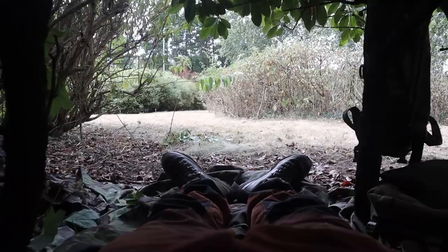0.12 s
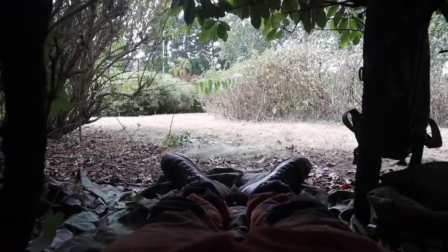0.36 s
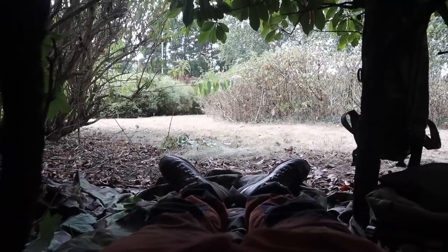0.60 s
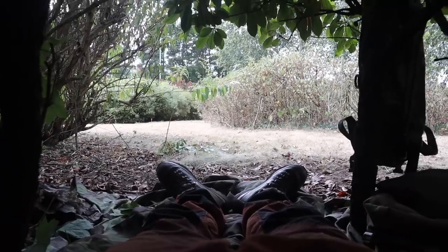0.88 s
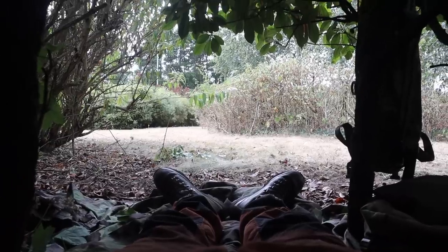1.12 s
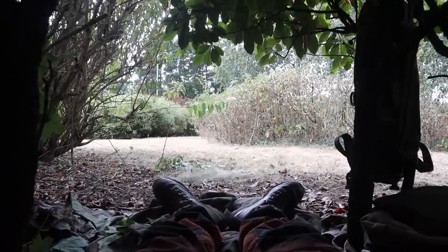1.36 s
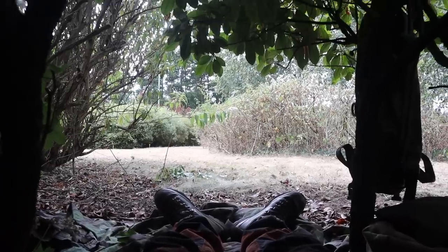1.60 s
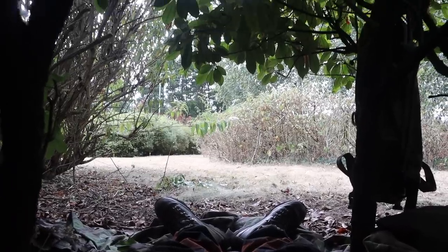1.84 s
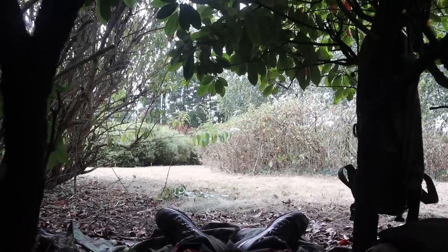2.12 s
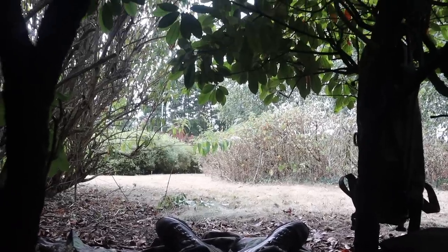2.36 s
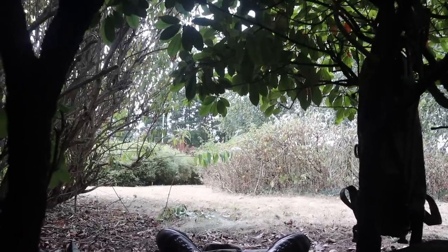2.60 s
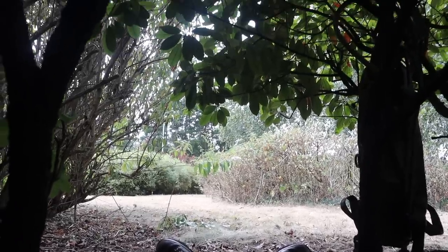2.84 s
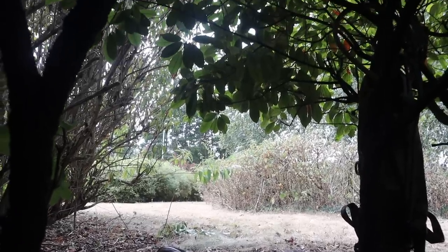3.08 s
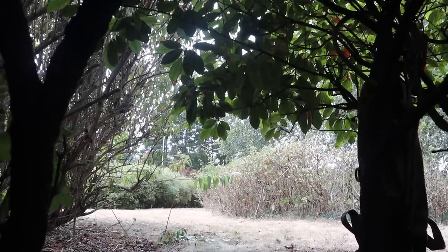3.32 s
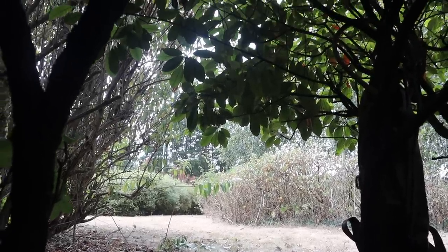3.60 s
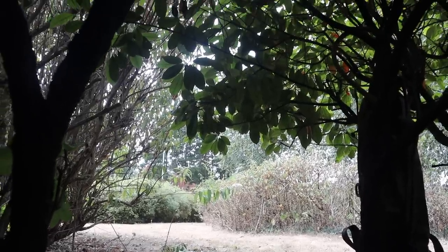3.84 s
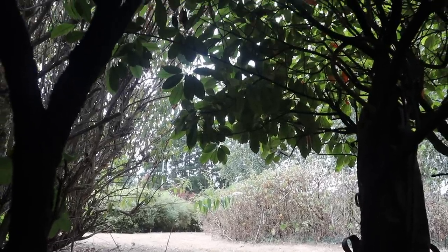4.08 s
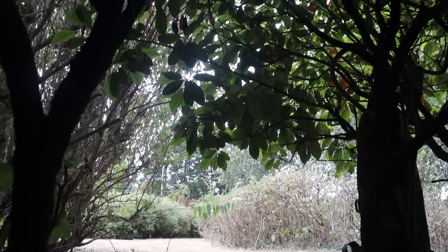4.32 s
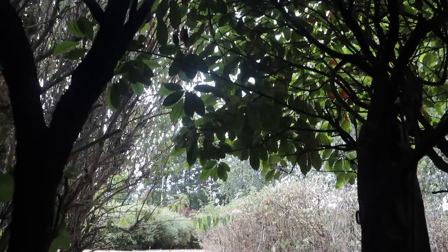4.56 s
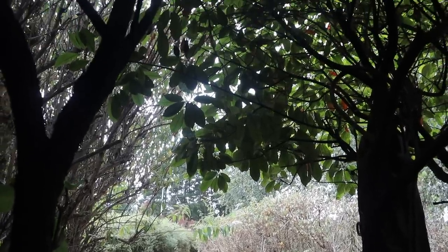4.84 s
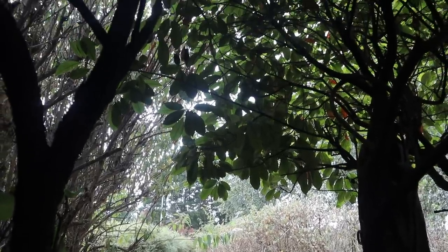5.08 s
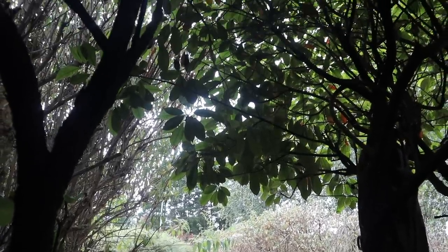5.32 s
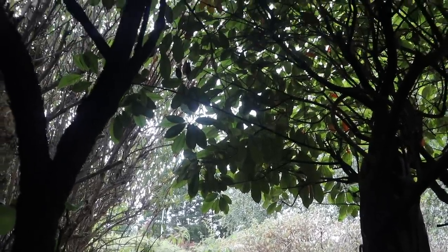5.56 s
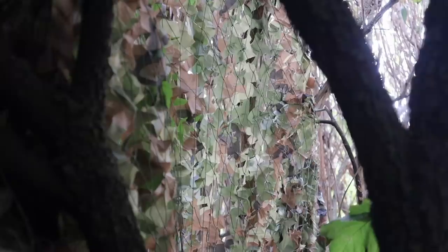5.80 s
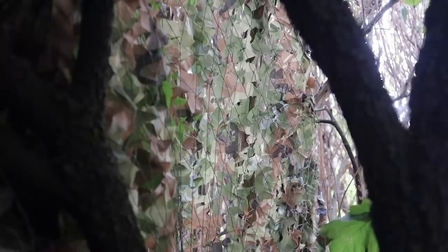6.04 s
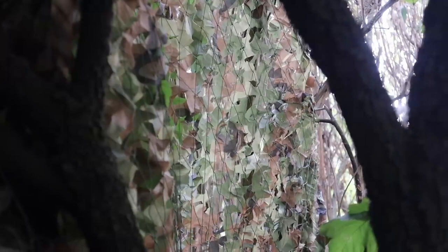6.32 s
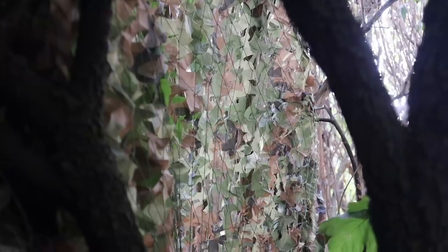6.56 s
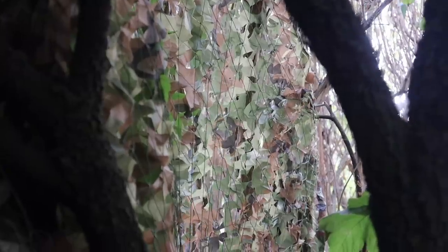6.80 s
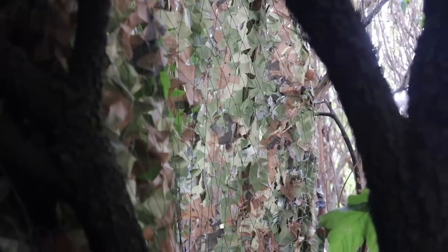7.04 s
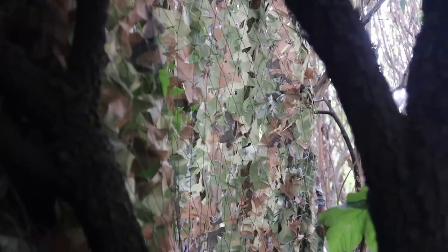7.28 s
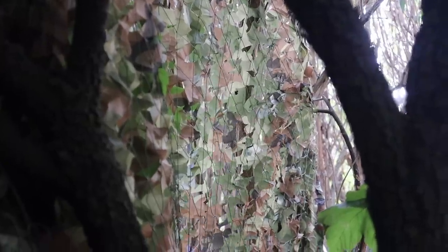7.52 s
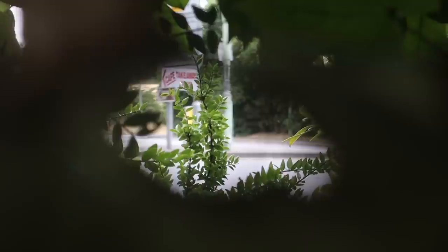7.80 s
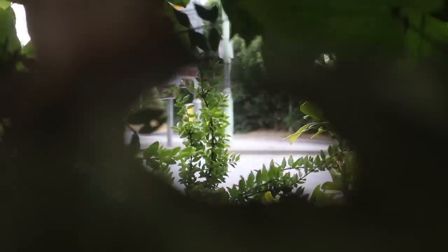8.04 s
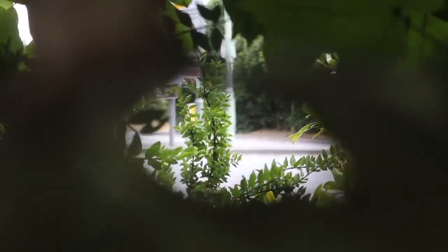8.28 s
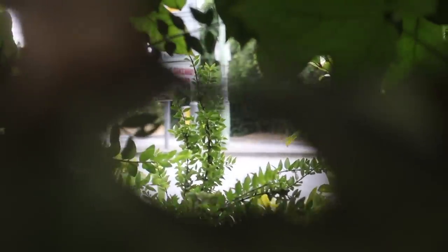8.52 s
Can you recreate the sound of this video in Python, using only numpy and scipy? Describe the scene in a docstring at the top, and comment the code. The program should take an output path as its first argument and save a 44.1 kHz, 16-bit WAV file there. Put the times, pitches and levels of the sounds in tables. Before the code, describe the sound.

From a hidden spot in shrubs, distant road rumble grows into a loud diesel and tyre roar, then cuts to brake squeaks and idling engines.

```python
"""A roundabout heard from inside the bushes, in four shots: traffic circles and a heavy diesel draws near.
Traffic is shaped noise that swells with closeness; engines are sums of sines at multiples of a firing tone.
Birds and brake squeals are gliding sines; air puffs and a snapping twig are short noise bursts.
The widening microphone leaves the treble largely out of phase between the channels.
The first two shots abut; a silent gap precedes each of the last two, which fade in fast."""
import sys
import numpy as np
from scipy import signal
from scipy.io import wavfile
from scipy.ndimage import uniform_filter1d, map_coordinates

SR = 44100
rng = np.random.default_rng(int(sys.argv[2]) if len(sys.argv) > 2 else 0)


def master(y):
    """Save y as 16-bit WAV."""
    cut = np.clip(np.atleast_2d(y).T, -1, 1)
    pcm = np.round(cut * 32767)  # scale
    wavfile.write(sys.argv[1], SR, pcm.astype(np.int16))


def convert_level_to_amplitude(level_db):
    """Map a level in decibels to its linear amplitude factor."""
    exponent = np.asarray(level_db, float) / 20
    return 10 ** exponent


N = 381465

# Limits of the four shots: start_s, end_s
SHOT_LIMITS = [(0, .115), (.115, 5.6553), (5.7, 7.7487), (7.795, 8.7)]
# Noise spectra, relative power density: frequency_hz, density_db (per Hz)
# Exhaust rumble
RUMBLE_SPECTRUM = [(18, -36), (30, 3.5), (65, -0.5), (150, -8), (200, -23.5), (330, -120)]
# Body roar
ROAR_SPECTRUM = [(65, -66), (110, -5), (135, -4), (220, 0.5), (263, -2), (340, -7), (440, -33.5),
                 (750, -120)]
# Drone above the roar
DRONE_SPECTRUM = [(180, -19), (300, -5.5), (398, -3.5), (493, -4), (700, -10.5), (910, -18.5), (1540, -120)]
# Tyre noise
TYRE_SPECTRUM = [(360, -43), (620, -8), (1030, -6.5), (1230, -13.5), (1350, -14.5), (1760, -22.5),
                 (2970, -120)]
# Whine of the tread
TREAD_SPECTRUM = [(680, -48), (1150, 3.5), (1480, 2.5), (1680, 4.5), (2030, 4), (2200, 0.5), (2700, -4),
                  (3510, -16), (5940, -120)]
# Tread hiss
HISS_SPECTRUM = [(1410, -72), (2400, -5), (2700, -3.5), (3020, 0), (4330, -6), (6380, -17.5), (7500, -30),
                 (9750, -53), (16500, -120)]
# Finest spray
FIZZ_SPECTRUM = [(3240, -41.5), (5500, -20), (6480, -3), (7290, -8), (8490, -7.5), (10200, -7),
                 (12600, -21), (16400, -60), (22000, -120)]
# Air puffs
PUFF_SPECTRUM = [(4000, -32), (7500, -6), (9800, -4.5), (11500, -13), (14000, -37.5)]
# Ringing panels of the diesel
PANEL_SPECTRUM = [(2400, -35), (2900, -10), (3350, -4), (3700, -24), (4400, -24), (4850, -6), (5300, -12.5),
                  (6200, -14.5), (7000, -46)]
# Stereo likeness of diffuse noise: frequency_hz, left_right_correlation (-1 to 1)
STEREO_LIKENESS = [(60, .9999), (110, .9996), (200, .992), (350, 0.98), (640, 0.81), (1150, 0.18),
                   (2070, -0.24), (3740, -0.43), (6740, -0.71), (12200, -0.66)]
# Channel imbalance of the microphone: frequency_hz, left_minus_right_db
MICROPHONE_LEAN = [(60, 0.0), (130, 0.0), (270, -0.5), (580, 1.0), (1250, -1), (2670, -1), (5700, 2.5),
                   (12200, -3.5)]
# Approach of the traffic, one list per shot: time_s, engine_closeness, tyre_closeness (about 0 to 1)
TRAFFIC_CLOSENESS = [
    [(0, 0.3, 0.2), (.11, 0, 0.2)],
    [(.125, 0.08, 0.08), (1.1, .05, .05), (1.6, 0.24, 0.06), (2.6, 0.33, 0.19), (3.1, 0.56, 0.39),
     (3.6, 0.66, 0.58), (4.1, 0.94, .7), (4.6, 0.92, .9), (5.1, 0.97, 0.96), (5.4, 1.05, 0.85),
     (5.65, 0.81, 0.77)],
    [(5.7, 0.37, 1), (5.82, 0.25, 0.14), (6.3, .4, 0.2), (6.9, 0.21, 0.19), (7.46, 0.4, 0.42),
     (7.51, 0.45, .65), (7.61, 0.26, 0.5), (7.66, 0.45, 0.4), (7.75, 0.5, 0.5)],
    [(7.79, 0.32, 0.27), (8.2, 0.38, 0.13), (8.65, 0.37, 0.08)],
]
# Layer levels by name: far level in shots 1 to 4 as level_db (four columns), rise_db per unit closeness
LAYER_LEVELS = dict(rumble=(-41.5, -34, -41.5, -32, 5.5), roar=(-47, -38.5, -34.5, -38, 6),
                drone=(-54.5, -47, -43, -43.5, 11), tyre=(-49, -45, -39.5, -39.5, 4),
                tread=(-57.5, -49, -45, -48.5, 6.5), hiss=(-64.5, -55.5, -54.5, -56, 8.5),
                fizz=(-74.5, -72, -69, -74.5, 12))
# Cars moving round, one row per shot: start_left_minus_right_db, end_left_minus_right_db, roar_side_gain_db
CAR_SWEEP = [(-1, -3, 10), (-3, 2, 4.5), (1, 2.2, -19), (0.5, 1, 6)]
# Bird notes: start_s, length_s, from_hz, to_hz, level_db
BIRD_NOTES = [(.12, .16, 8600, 8000, -70), (.35, .18, 8080, 7700, -68), (.585, .175, 7400, 8330, -69),
              (.8, .11, 8250, 7800, -73), (1.0, .17, 8250, 7100, -67)]
# Buzzy ending of the bird's song: start_s, length_s, from_hz, to_hz, level_db
BIRD_TRILL = [(1.19, .09, 5600, 6100, -61), (1.32, .12, 5800, 6150, -61)]
# Rising chirps of a nearer bird: start_s, length_s, from_hz, to_hz, level_db
NEAR_CHIRPS = [(5.338, .05, 5850, 6300, -57), (5.438, .052, 4150, 6100, -50), (5.58, .036, 4500, 5950, -54)]
# Snapping twig: start_s, onset_level_db (of the noise shared by the channels)
TWIG_SNAP = (2.064, -36.5)
# Puffs of air: peak_s, level_db
AIR_PUFFS = [(1.78, -71), (2.17, -76), (2.45, -75), (2.75, -75), (3.06, -69), (3.37, -67), (3.68, -68),
             (3.98, -66), (4.29, -69), (4.59, -58.5), (4.9, -68), (5.19, -72), (5.48, -61)]
# Brake squeals, cut at the limits of their shot: peak_s, half_length_s, pitch_hz, level_db, waver_hz
BRAKE_SQUEALS = [(2.6, .56, 12420, -71, 70), (5.712, .014, 4750, -39.5, 45), (5.713, .014, 3850, -48, 40),
                 (5.743, .012, 4740, -45, 45), (5.775, .026, 4730, -44, 45), (5.86, .16, 4680, -52, 55),
                 (6.53, .2, 4830, -65, 12), (7.35, .22, 5315, -69, 12), (7.54, .12, 4008, -51, 7),
                 (7.69, .06, 4005, -52.5, 7), (8.1, 1.2, 11130, -77, 90)]
# Engines idling near the later shots: start_s, end_s, pitch_hz, level_db
IDLE_TONES = [(5.7, 7.79, 47.5, -43), (5.7, 7.79, 94, -43), (5.7, 7.79, 140, -47), (7.79, 8.55, 64.6, -34),
              (7.79, 8.65, 134.6, -37), (7.95, 8.65, 236.9, -40)]
# Diesel orders, keyed by multiple of the firing tone: far_level_db, rise_db per unit closeness
DIESEL_ORDERS = {1: (-37.5, 10.2), 1.5: (-39.5, -2.1), 2: (-46.5, 15.7), 3: (-49, 9), 4: (-48, 7.6)}


def unit(x):
    """Normalisation: scale to rms 1."""
    return x / np.sqrt(np.mean(x ** 2) + 1e-20)


def along(points, hz):
    """Interpolation: read (Hz, value) points on a logarithmic frequency axis."""
    f, v = np.transpose(points)
    return np.interp(np.log(hz + 1), np.log(f + 1), v)


def curves(rows):
    """Interpolation in time: one value per sample for each column after the time."""
    s, *cols = np.transpose(rows)
    return [np.interp(np.arange(N) / SR, s, c) for c in cols]


def by_shot(values):
    """Piecewise constancy: one value per shot, held for every sample of it."""
    starts = [start for start, _ in SHOT_LIMITS]
    return np.asarray(values)[np.searchsorted(starts, np.arange(N) / SR, "right") - 1]


def wobble(rate, size=N):
    """Band-limited fluctuation: a smooth random curve with rate knots a second."""
    knots = rng.standard_normal(int(size * rate / SR) + 4)
    return map_coordinates(knots, [np.arange(size) * rate / SR])


def rush(spectrum, patchy_db, pan_db=0):
    """Diffuse field: filtered stereo noise, mid rms 1 before panning, with patches of random gain."""
    hz, _, noise = signal.stft(rng.standard_normal((2, N)), SR, nperseg=2048)
    patches = uniform_filter1d(rng.standard_normal(noise.shape[1:]), size=12, axis=0)
    patches = uniform_filter1d(patches, size=4, axis=1)
    # a side/mid ratio of tan(angle) gives a channel correlation of cos(2 angle)
    angle = np.arccos(np.clip(along(STEREO_LIKENESS, hz), -1, 1)) / 2
    mid_side_gain = convert_level_to_amplitude(along(spectrum, hz)) * [np.ones_like(angle), np.tan(angle)]
    mid, side = noise * convert_level_to_amplitude(patchy_db * unit(patches)) * mid_side_gain[:, :, None]
    lean = convert_level_to_amplitude(along(MICROPHONE_LEAN, hz) / 2)[:, None]
    channels = np.array([(mid + side) * lean, (mid - side) / lean])
    left, right = signal.istft(channels, nperseg=2048)[1][:, :N]
    panned = np.array([left * convert_level_to_amplitude(pan_db / 2), right * convert_level_to_amplitude(-pan_db / 2)])
    return panned / np.std((left + right) / 2)


def wide(left, right, lean_db):
    """Phase opposition: the widening microphone inverts a bright point source in one channel."""
    return np.array([left * convert_level_to_amplitude(lean_db / 2), -right * convert_level_to_amplitude(-lean_db / 2)])


def whistles(notes, lean_db, flutter_db, waver_rate, fade=0.006, skew=0.56):
    """Frequency modulation: wavering sines and octaves; skew (rad) and flutter part the channels."""
    out = np.zeros((2, N + SR))
    for start_s, hz, db, octave_db, waver_hz in notes:
        t = np.arange(len(hz)) / SR
        gate = np.sqrt(2) * np.clip(np.minimum(t, t[-1] - t) / fade, 0, 1)
        phase = 2 * np.pi * np.cumsum(hz + waver_hz * wobble(waver_rate, len(t))) / SR
        octave = convert_level_to_amplitude(octave_db) * np.sin(2 * phase) * (hz < SR / 6)
        wave = np.sin(phase + [[skew], [-skew]]) + octave
        flutter = np.array([wobble(60, len(t)), wobble(59.7, len(t))])
        left, right = gate * convert_level_to_amplitude(db + flutter_db * flutter) * wave
        out[:, round(start_s * SR):][:, :len(t)] += wide(left, right, lean_db)
    return out[:, :N]


def layer_db(name, closeness):
    """Level and distance: a layer's far level in each shot, raised as the traffic closes in."""
    *far_db, rise_db = LAYER_LEVELS[name]
    return by_shot(far_db) + rise_db * closeness


def car_pan_db():
    """Amplitude panning: the level difference moves linearly through each shot."""
    start, end = by_shot(SHOT_LIMITS).T
    pan_from, pan_to, _ = by_shot(CAR_SWEEP).T
    return pan_from + (pan_to - pan_from) * (np.arange(N) / SR - start) / (end - start)


def motor_noise(closeness, swell, pan_db):
    """Low-frequency radiation: exhaust rumble, body roar and drone of many cars as bands of noise."""
    rumble = rush(RUMBLE_SPECTRUM, patchy_db=0.94)
    left, right = rush(ROAR_SPECTRUM, patchy_db=-0.5)
    side = np.array([left - right, right - left]) / 2
    roar = (left + right) / 2 + side * convert_level_to_amplitude(by_shot(CAR_SWEEP)[:, 2])
    drone = rush(DRONE_SPECTRUM, patchy_db=0.84, pan_db=pan_db / 2)
    return (convert_level_to_amplitude(layer_db("rumble", closeness) + 1.1 * wobble(12)) * rumble
            + convert_level_to_amplitude(layer_db("roar", closeness) + 0.34 * swell) * roar
            + convert_level_to_amplitude(layer_db("drone", closeness) + 0.21 * swell) * drone)


def rolling_noise(closeness, swell, pan_db):
    """Tyre-road friction: tyre noise, tread whine, hiss and fine spray as bands of noise."""
    hiss_pan = 0.35 * pan_db
    tread_near = np.abs(closeness) ** 0.48  # the whine carries from far off
    fizz_near = np.abs(closeness) ** 2.85  # the finest spray carries only from close by
    tyre = rush(TYRE_SPECTRUM, patchy_db=-0.75, pan_db=pan_db)
    tread = rush(TREAD_SPECTRUM, patchy_db=-0.5, pan_db=pan_db)
    hiss = rush(HISS_SPECTRUM, patchy_db=-2.0, pan_db=hiss_pan)
    fizz = rush(FIZZ_SPECTRUM, patchy_db=1.0, pan_db=hiss_pan)
    return (convert_level_to_amplitude(layer_db("tyre", closeness) + 1.3 * swell) * tyre
            + convert_level_to_amplitude(layer_db("tread", tread_near) + 0.086 * swell) * tread
            + convert_level_to_amplitude(layer_db("hiss", closeness) + 0.49 * swell) * hiss
            + convert_level_to_amplitude(layer_db("fizz", fizz_near) + 0.49 * wobble(9.9)) * fizz)


def traffic():
    """Incoherent superposition: the noise of many cars swells together and apart."""
    motor, rolling = curves(np.concatenate(TRAFFIC_CLOSENESS))
    swell, pan_db = wobble(9.5), car_pan_db()
    return motor_noise(motor, swell, pan_db) + rolling_noise(rolling, swell, pan_db)


def sung(rows, octave_db, waver_hz, peak_at=.5):
    """Pitch glide: each note moves under an arched level that peaks at a share of its length."""
    for start_s, length, from_hz, to_hz, db in rows:
        u = np.arange(0, 1, 1 / (length * SR))
        glide = 1 - (1 - u) ** 3.6 if to_hz > from_hz else u  # rising notes leap, then level off
        arch_db = -6 * (2 * (u - peak_at)) ** 2
        yield start_s, from_hz + (to_hz - from_hz) * glide, db + arch_db, octave_db, waver_hz


def bird():
    """Near-sinusoidal song: thin high notes end in a buzz of wide pitch waver; later come a few chirps."""
    notes = whistles(sung(BIRD_NOTES, -40, 50), lean_db=2.5, flutter_db=2.2, waver_rate=300)
    trill = whistles(sung(BIRD_TRILL, -40, 400), lean_db=2.5, flutter_db=1.5, waver_rate=400)
    chirps = whistles(sung(NEAR_CHIRPS, -40, 60, peak_at=.08), lean_db=1, flutter_db=1,
                      waver_rate=300, fade=.002, skew=.9)
    return notes + trill + chirps


def twig():
    """Impulsive fracture: a dry snap of partly shared noise, decaying 60 dB in 5 ms."""
    start_s, level_db = TWIG_SNAP
    t = np.arange(N) / SR - start_s
    envelope = convert_level_to_amplitude(level_db - 60 * np.abs(t) / .005) * (t > 0)
    noise = rng.standard_normal(N) + 0.84 * rng.standard_normal((2, N))
    left, right = envelope * noise
    return wide(left, right, lean_db=-2.0)


def puffs():
    """Turbulent air: bright noise under brief Gaussian envelopes, at nearly even intervals."""
    t = np.arange(N) / SR
    shape = sum(convert_level_to_amplitude(db) * np.exp(-((t - peak_s) / 0.019) ** 2) for peak_s, db in AIR_PUFFS)
    return shape * rush(PUFF_SPECTRUM, patchy_db=4)


def brakes():
    """Stick-slip friction: pads sing narrow tones that judder, then sag in pitch as they let go."""
    notes = []
    for peak, half, hz, db, waver_hz in BRAKE_SQUEALS:
        start, end = next(shot for shot in SHOT_LIMITS if peak < shot[1])
        t = np.arange(max(start, peak - half), min(end, peak + half), 1 / SR)
        u = (t - peak) / half  # -1 to 1 over the full squeal
        sag_hz = 300 * half * np.clip(u, 0, 1) ** 2
        grip_db = -14 * np.abs(u) ** 3
        judder_db = 1.6 * wobble(30, len(t))
        octave_db = -18 - 12 * u
        notes.append((t[0], hz - sag_hz, db + grip_db + judder_db, octave_db, waver_hz))
    return whistles(notes, lean_db=-.8, flutter_db=2.2, waver_rate=250, fade=.004, skew=.45)


def shaky(db, phase):
    """Uneven firing: a sine whose level and phase fluctuate."""
    return np.sqrt(2) * convert_level_to_amplitude(db + 1.5 * wobble(7)) * np.sin(phase + .3 * wobble(6))


def idling_engines():
    """Steady periodicity: low tones of engines idling near the later shots, faded out at their ends."""
    t = np.arange(N) / SR
    return sum(shaky(db, 2 * np.pi * hz * t) * (t > start) * np.clip((end - t) / 0.091, 0, 1)
               for start, end, hz, db in IDLE_TONES)


def pulling_engine():
    """Rising rotation rate: a second engine pulls away on one climbing tone."""
    start_s, start_hz, climb_hz_per_s = 4.1, 67, 14
    level_db, rise_s, rise_db = -32.5, 0.34, 17
    since = np.arange(N) / SR - start_s
    pull_db = level_db - rise_db * np.clip(1 - since / rise_s, 0, 1)
    phase = 2 * np.pi * np.cumsum(start_hz + climb_hz_per_s * since) / SR
    return shaky(pull_db, phase) * (since > 0)


def clatter(firing_phase):
    """Forced vibration: panels ring with injector clatter as the diesel passes, pulsing at its firing tone."""
    peak_db, peak_s, half_level_s = -54, 4.98, 0.9  # falls 6 dB in half_level_s
    t = np.arange(N) / SR
    level_db = peak_db + 20 * np.log10(.5) * ((t - peak_s) / half_level_s) ** 2
    return convert_level_to_amplitude(level_db) * (1 + 0.21 * np.sin(firing_phase)) * rush(PANEL_SPECTRUM, patchy_db=-2.0)


def diesel():
    """Harmonic orders: multiples of a climbing firing tone boom on crossing the exhaust resonance."""
    firing_hz, climb_hz_per_s = 48.3, 1.27  # firing tone at 0 s and its climb
    pipe_hz, pipe_width_hz, pipe_db = 105.9, 2.6, 6.5
    near = curves(np.concatenate(TRAFFIC_CLOSENESS))[0]
    hz = firing_hz + climb_hz_per_s * np.arange(N) / SR
    phase = 2 * np.pi * np.cumsum(hz) / SR
    orders = 0
    for k, (far_db, rise_db) in DIESEL_ORDERS.items():
        boom_db = pipe_db * np.exp(-((k * hz - pipe_hz) / pipe_width_hz) ** 2)
        orders = orders + shaky(far_db + rise_db * near + boom_db, k * phase)
    return orders + clatter(phase)


def engines():
    """Superposition: the diesel and the engine pulling away sound in the second shot, idling tones later."""
    t = np.arange(N) / SR
    start, end = SHOT_LIMITS[1]
    return (diesel() + pulling_engine()) * (t > start) * (t < end) + idling_engines()


def scene():
    """Linear superposition of all sources."""
    return traffic() + bird() + twig() + puffs() + brakes() + engines()


def top_cut(x):
    """Nothing passes above the cut-off."""
    return signal.sosfilt(signal.butter(12, 12770, fs=SR, output="sos"), x)


def record(dry):
    """High-pass response: the microphone cuts deep bass; shots end abruptly and the last two fade in fast."""
    t = np.arange(N) / SR
    deep_cut = signal.butter(3, 54, "high", fs=SR, output="sos")  # Hz
    heard = signal.sosfilt(deep_cut, dry)
    first_two = t < SHOT_LIMITS[1][1]
    last_two = sum(np.clip((t - start) / 0.0085, 0, 1) ** 2 * (t < end) for start, end in SHOT_LIMITS[2:])
    return top_cut(heard * (first_two + last_two))


dry = scene()
out = record(dry)
master(out)
```